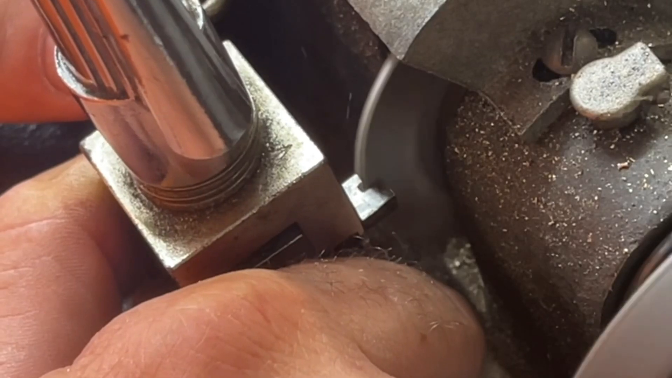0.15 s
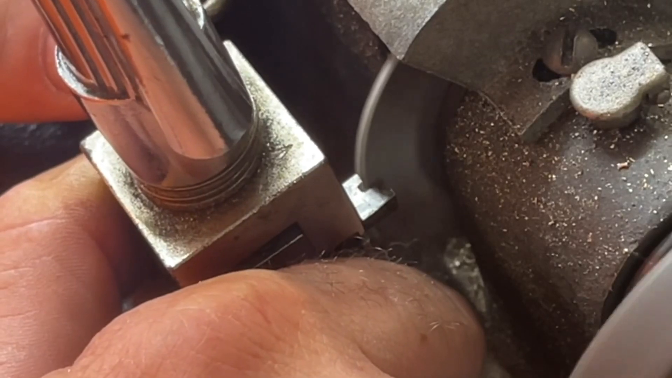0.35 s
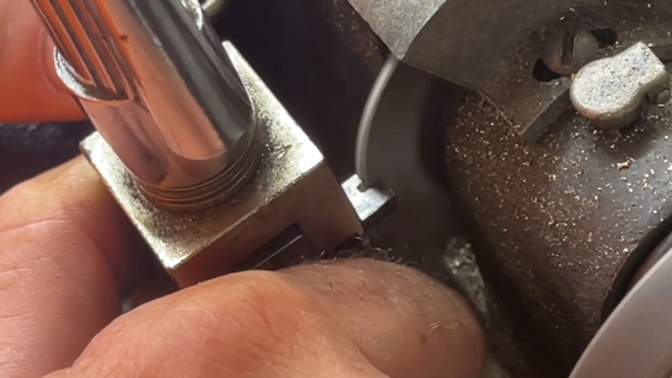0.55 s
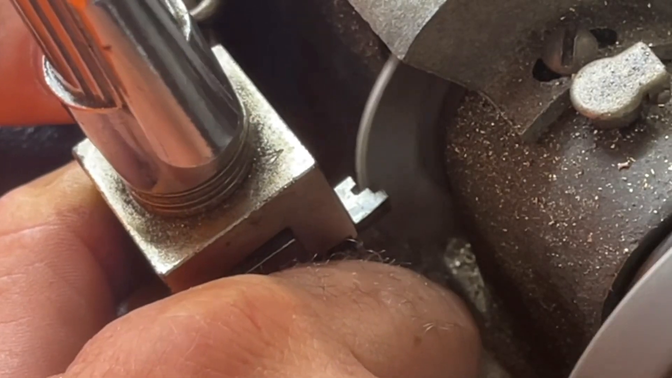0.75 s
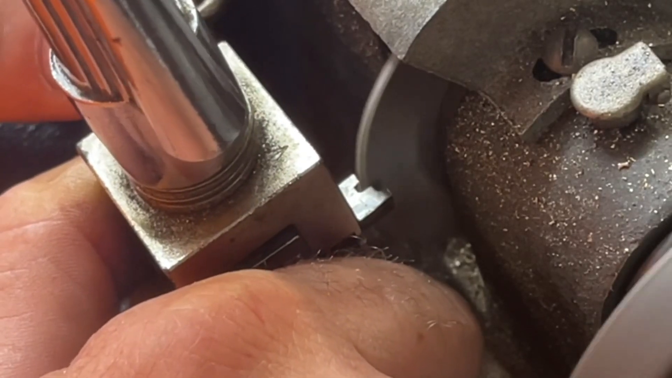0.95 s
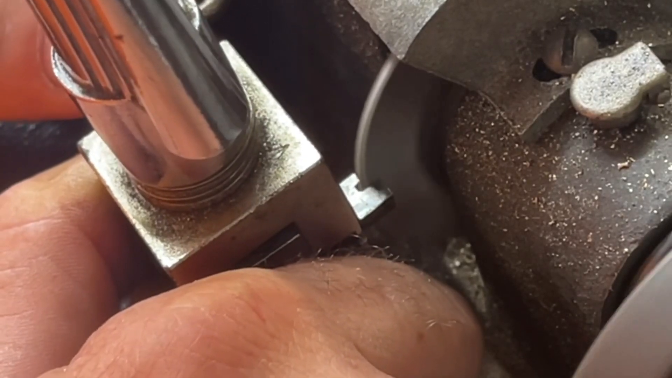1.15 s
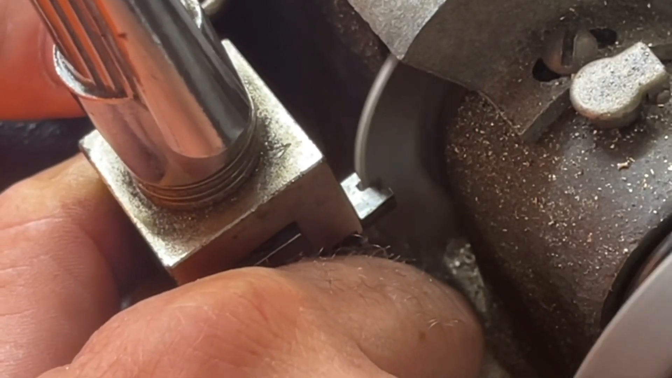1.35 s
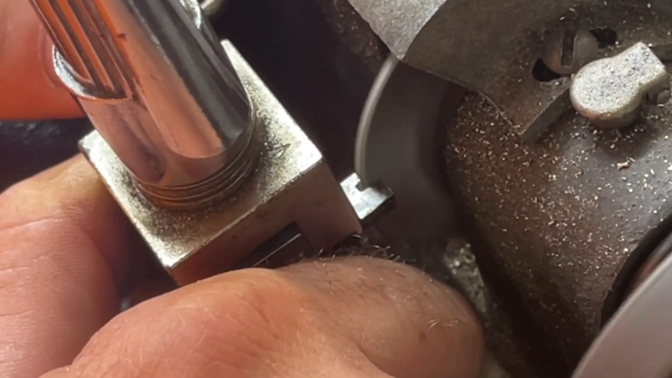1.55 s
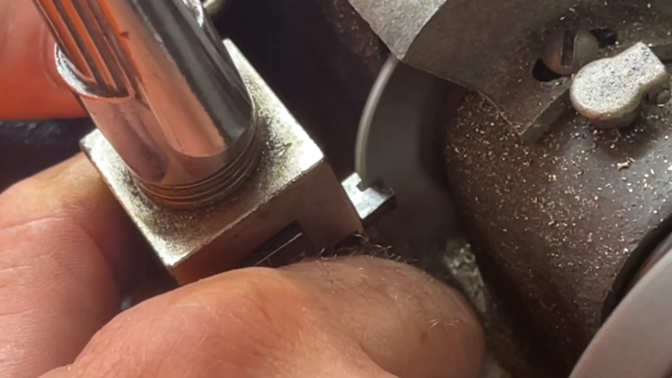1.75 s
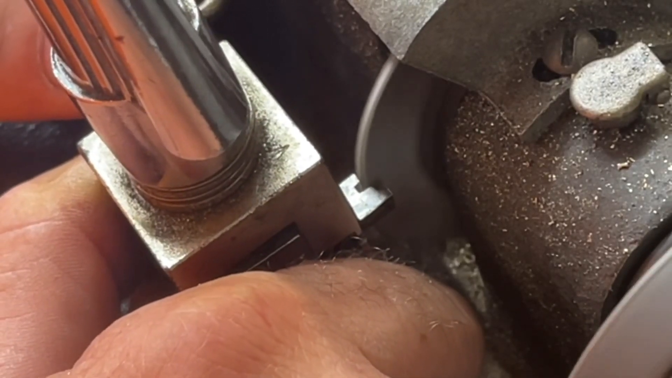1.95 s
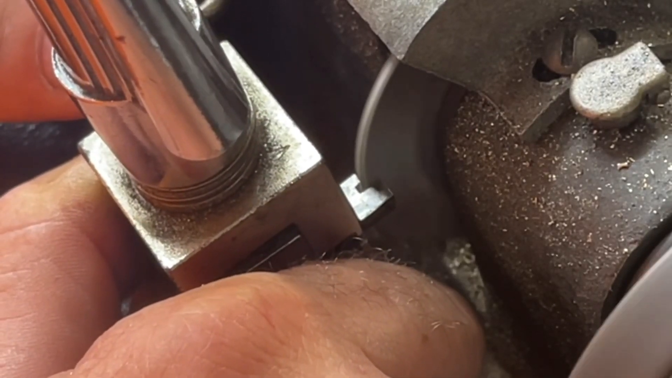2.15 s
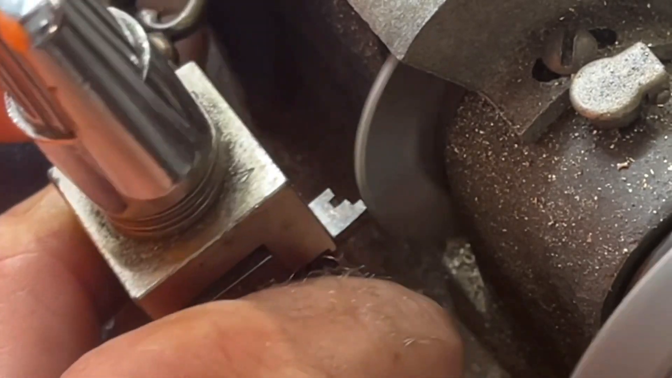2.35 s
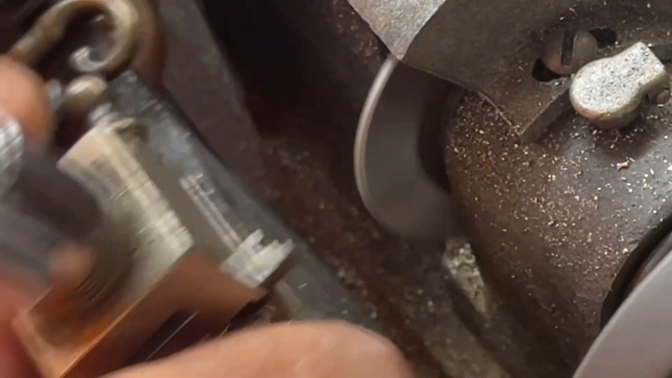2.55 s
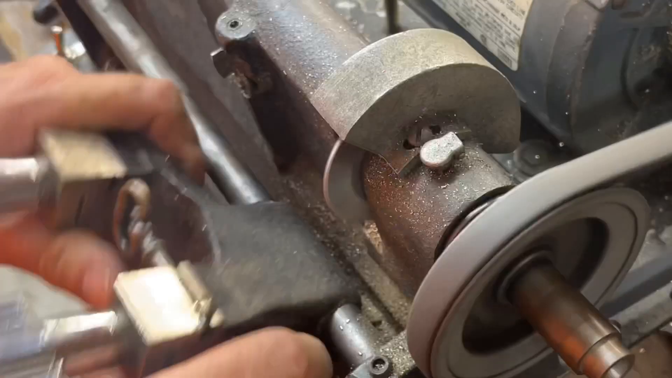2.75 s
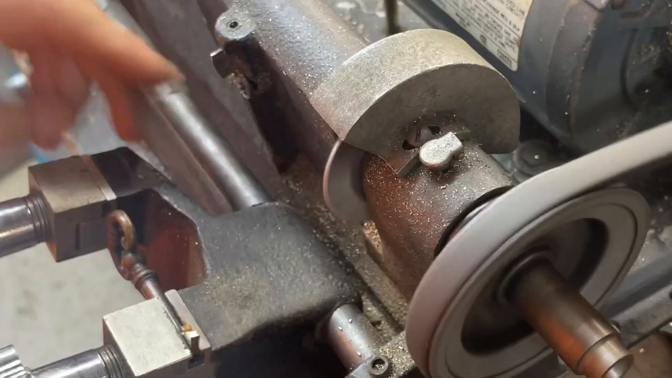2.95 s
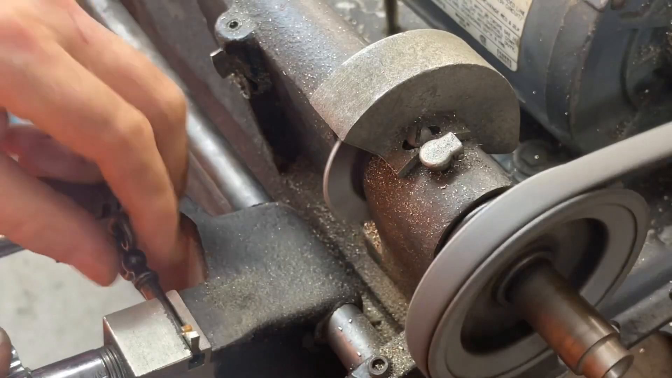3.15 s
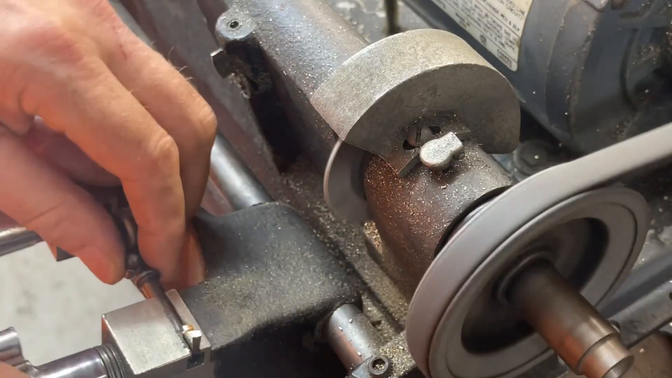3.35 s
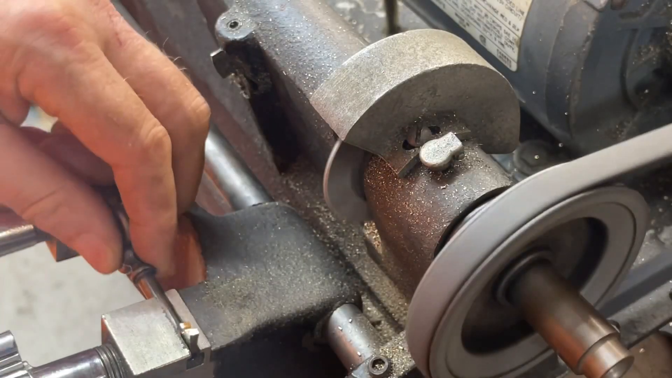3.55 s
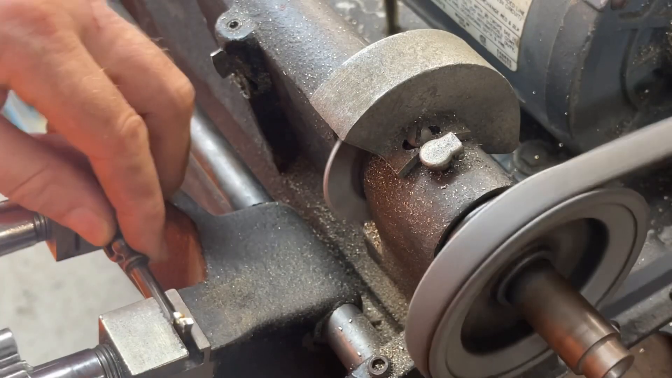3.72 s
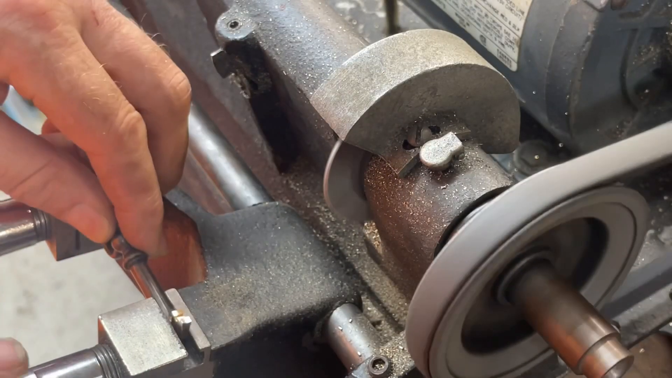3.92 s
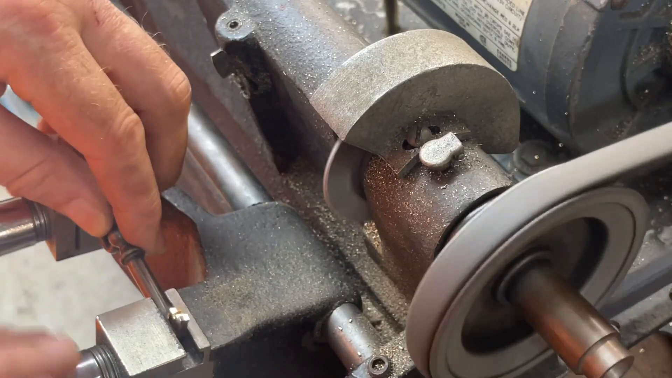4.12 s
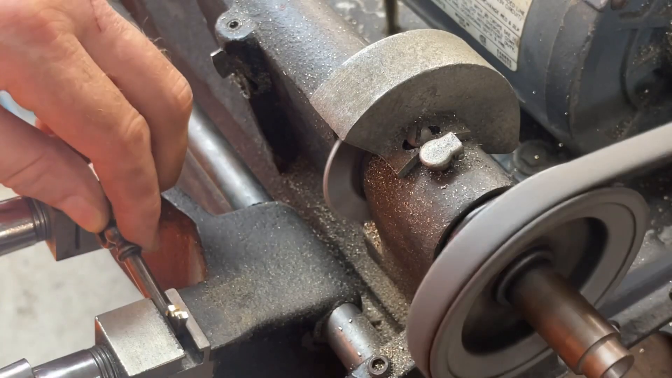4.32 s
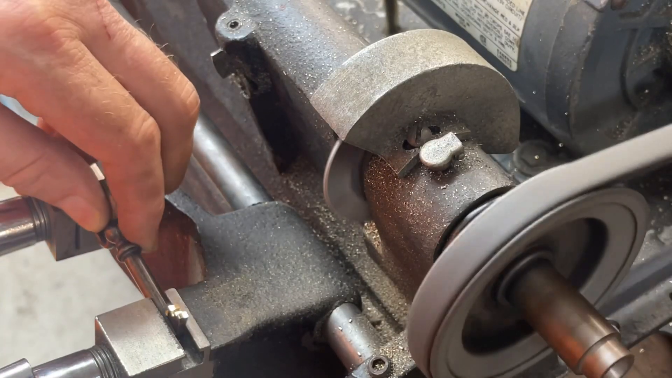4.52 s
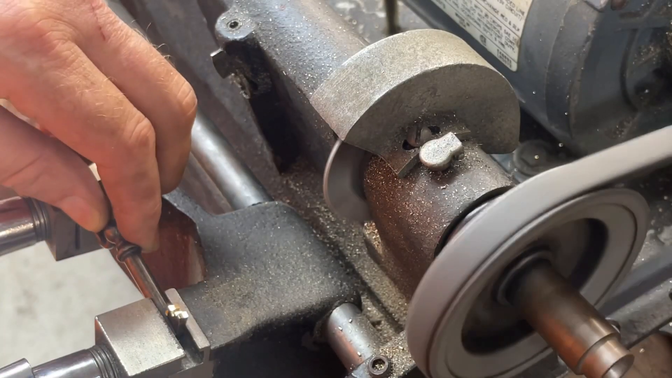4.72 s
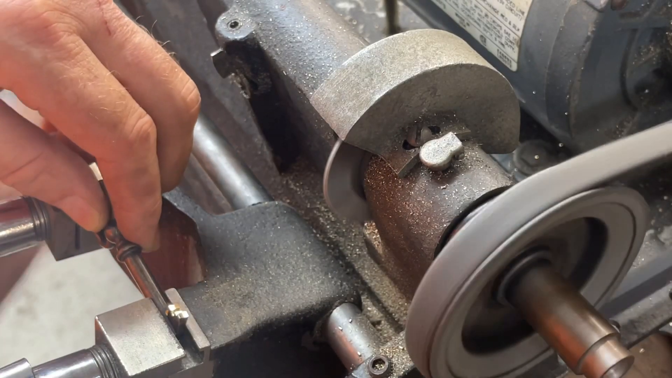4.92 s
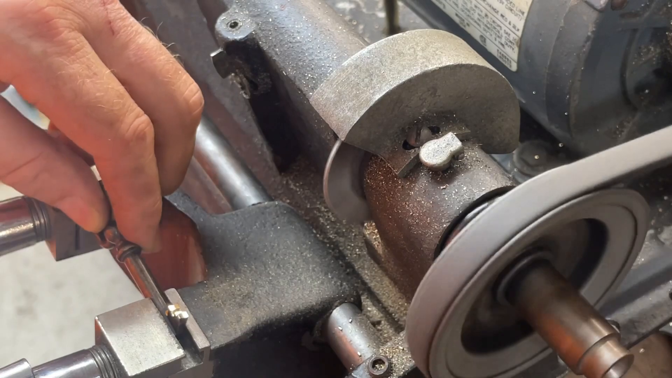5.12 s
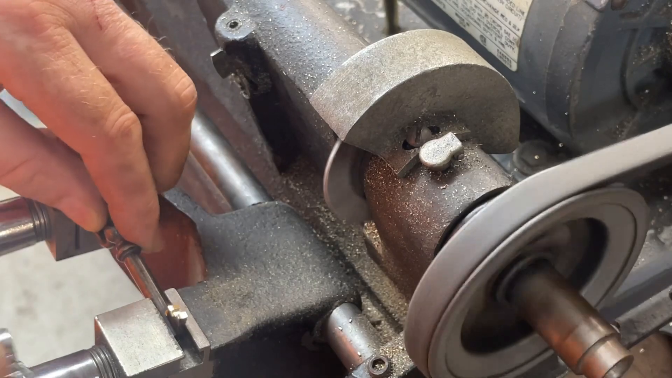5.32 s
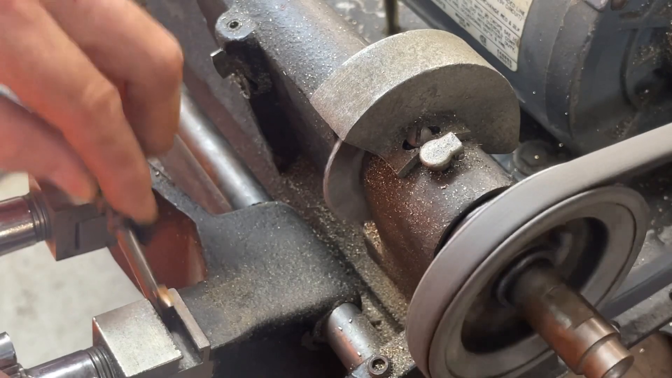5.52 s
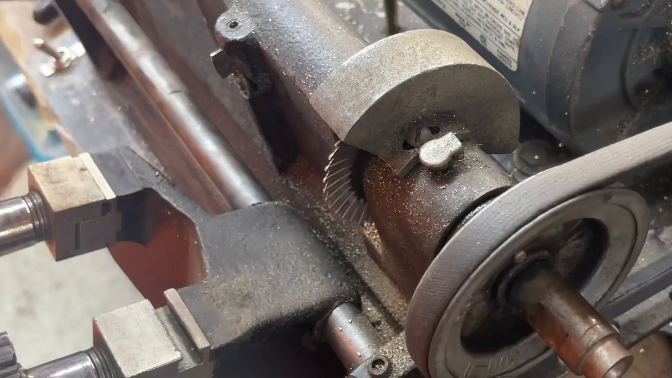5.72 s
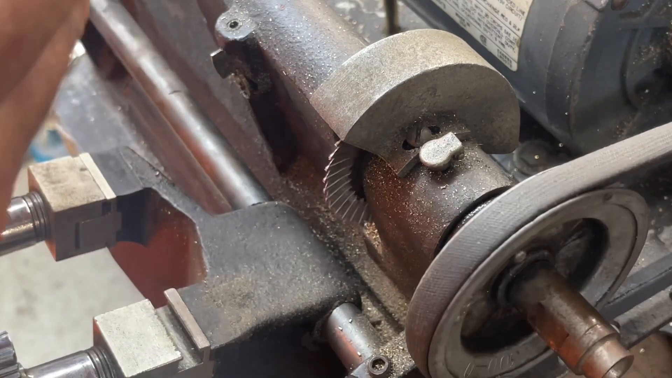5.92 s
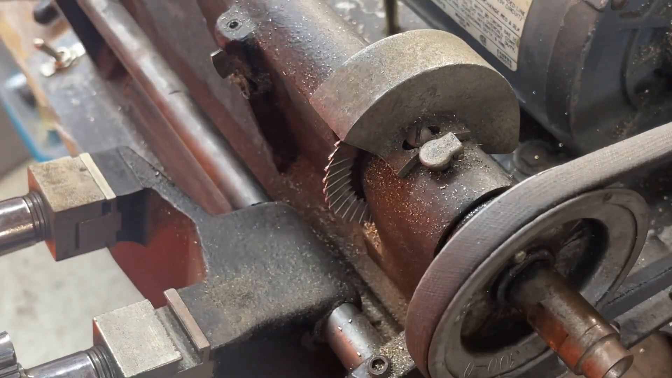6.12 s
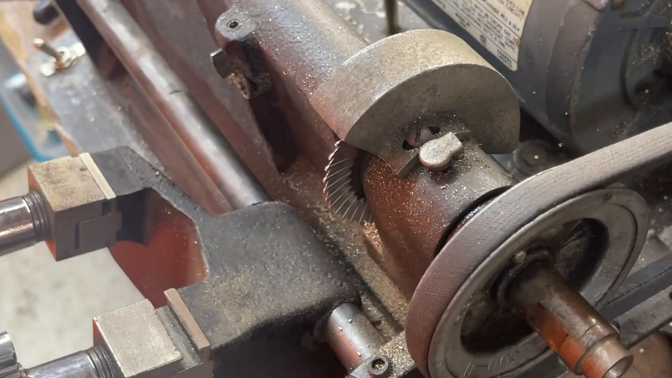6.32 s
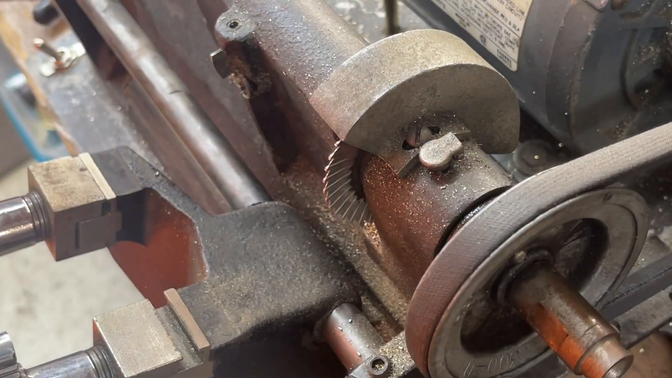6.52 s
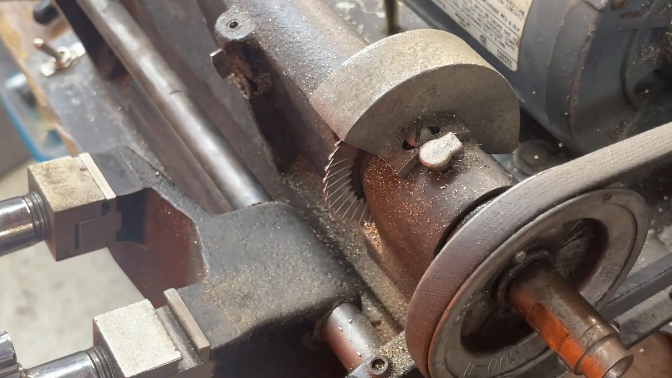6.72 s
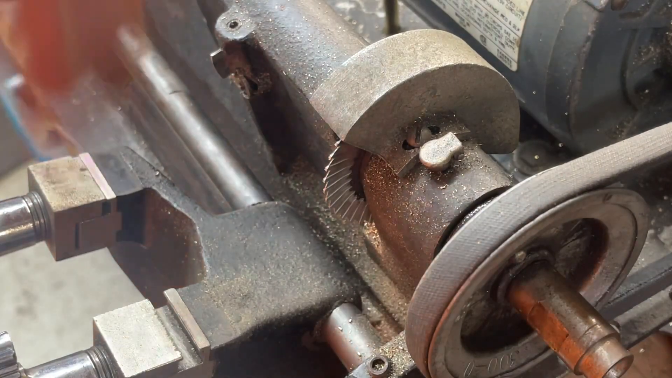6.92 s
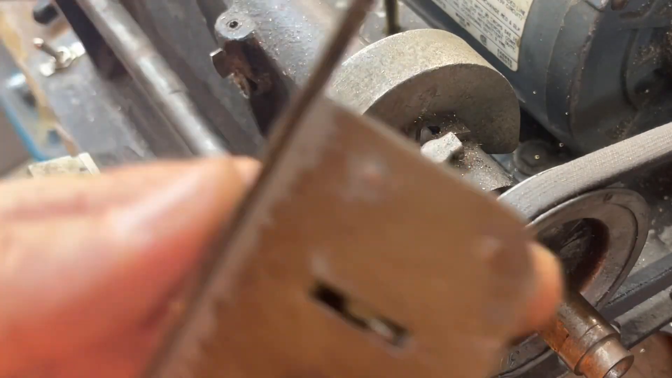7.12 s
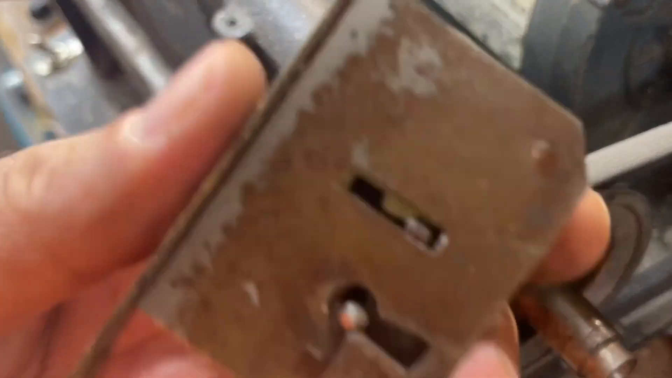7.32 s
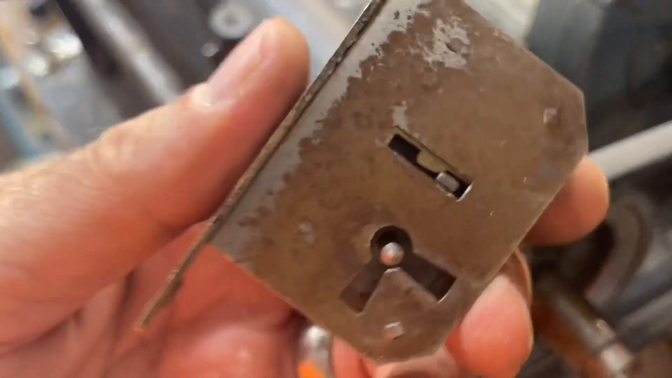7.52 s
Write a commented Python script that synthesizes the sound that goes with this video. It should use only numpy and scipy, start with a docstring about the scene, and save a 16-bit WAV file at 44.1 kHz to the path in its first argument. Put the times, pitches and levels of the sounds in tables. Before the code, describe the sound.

Close in a small workshop, a belt-driven key cutter hums and rattles fast while its teeth rasp at a brass key in tiny gritty bites. The carriage drops back with a loud clunk, briefly ducking the sound. A switch snaps, the machine coasts down in slowing knocks, a key scrapes out of the vice, then soft handling and a thin steel lever squeak follow in near quiet.

```python
"""A belt-driven key-cutting machine hums and rattles close by while its cutter bites into a brass key.
The motor gives steady tones; the belt, shaft and spindle add throbs, thuds and clacks made of shaped noise.
The carriage drops back with a clunk, and a limiter ducks the sound after it.
The motor is switched off and coasts to rest, knock by knock.
The key scrapes out of the vice, and a steel lock is picked up in the quiet workshop."""
import sys
import numpy as np
from scipy import signal
from scipy.fft import rfft, irfft, next_fast_len
from scipy.io import wavfile
from scipy.ndimage import uniform_filter1d, minimum_filter1d

SR = 44100
rng = np.random.default_rng(int(sys.argv[2]) if len(sys.argv) > 2 else 0)


def bounce(signal):
    """Save signal as a 16-bit WAV file at the path given by the first command-line argument."""
    frames = np.transpose(np.atleast_2d(signal))
    limited = np.clip(frames, -1, 1)
    pcm = np.round(limited * 32767).astype(np.int16)
    wavfile.write(sys.argv[1], SR, pcm)


N = 338247
TIME = np.arange(N) / SR
OFF_S = 4.795  # the motor's current stops
SPINDLE_HZ, MOTOR_HZ, BELT_HZ = 19.231, 29.62, 9.42  # turns or laps a second at full speed
MAINS_HZ = 60


def amp(db):
    """Turns decibels into a gain."""
    return 10 ** (np.asarray(db) / 20)


def unit(x):
    """Scales a sound to an rms of one."""
    return x / np.sqrt(np.mean(x ** 2) + 1e-20)


def curve(rows):
    """Joins the points of a time table by straight lines, one value for every sample."""
    return np.interp(TIME, *np.transpose(rows))


def read(points, hz):
    """Reads a frequency table between its points, on a logarithmic frequency axis."""
    f, value = np.transpose(points)
    return np.interp(np.log(hz + 1), np.log(f + 1), value)


def add(mix, s, sound):
    """Lays a sound into the mix at a time in seconds."""
    part = mix[max(round(s * SR), 0):][:len(sound)]
    part += sound[:len(part)]


def drift(rate_hz):
    """Makes a random wander of unit size; a higher rate wanders faster."""
    hz = np.fft.rfftfreq(N, 1 / SR)
    noise = rfft(rng.standard_normal(N))
    return unit(irfft(noise * np.exp(-(hz / rate_hz) ** 2), N))


def body(x, colour, modes=(), hollows=(), size=16384):
    """Filters a sound like a solid object: a broad colour, lifted at ringing modes and dipped at hollows."""
    hz = np.fft.rfftfreq(size, 1 / SR)
    lift = 1 + sum(amp(db) ** 2 / (1 + (2 * (hz - f) / width) ** 2) for f, width, db in modes)
    dip_db = sum(db / (1 + (2 * (hz - f) / width) ** 2) for f, width, db in hollows)
    log_gain = np.log(amp(read(colour, hz) + dip_db) * np.sqrt(lift))
    # minimum phase: the object answers as soon as it can, never before the blow
    both_sides = np.r_[log_gain, log_gain[-2:0:-1]]
    response = np.exp(np.conj(signal.hilbert(both_sides)))
    ring = np.fft.ifft(response).real[:size // 2]
    return signal.oaconvolve(x, ring / np.linalg.norm(ring))[:N]


def resonate(x, hz, width_hz):
    """Rings a sound at one gliding pitch: shift that pitch to zero, smooth, and shift back."""
    turn = np.exp(2j * np.pi * np.cumsum(hz) / SR)
    r = np.exp(-np.pi * width_hz / SR)
    smooth = signal.lfilter([np.sqrt(2 * (1 - r * r))], [1, -r], x / turn + 1e-18)
    return (turn * smooth).real


def burst(shape, smooth_hz=300):
    """Puts noise under an envelope and evens out its colour, so that it sounds like one clean blow."""
    noise = shape * rng.standard_normal(len(shape))
    hz = np.fft.rfftfreq(len(shape), 1 / SR)
    power = uniform_filter1d(abs(rfft(noise)) ** 2, int(smooth_hz / hz[1]) + 1)
    opposite = np.c_[hz, -10 * np.log10(abs(power) + 1e-20)]
    even = body(noise, opposite, size=2048)[:len(shape)]
    return even * np.linalg.norm(shape) / np.linalg.norm(even)


def contacts(rows, rise, decay, tail_db, tail_decay, grain_db, alike):
    """Makes each blow (s, dB) a burst of tiny contacts with a weaker tail, partly alike and partly new."""
    t, power, blows = TIME[:SR // 4], np.zeros(N), np.zeros(N)
    shape = (1 - np.exp(-t / rise)) * (np.exp(-t / decay) + amp(tail_db - 60 * t / tail_decay))
    shape = shape / shape.max()
    same = burst(shape)
    for s, db in rows:
        add(power, s, (amp(db) * shape) ** 2)
        add(blows, s, amp(db) * same)
    grain = unit(amp(np.clip(grain_db * drift(2500), -9, 5)))
    new = np.sqrt(power) * grain * rng.standard_normal(N)
    return alike * blows + np.sqrt(1 - alike ** 2) * new


def pushes(rows, length_s, bounce_s, bounce_db, count=3):
    """Makes each blow (s, dB) a short smooth push of unit area, then nearly even, weaker bounces."""
    t, out = TIME[:SR // 200], np.zeros(N)
    push = t * np.exp(-t / length_s)
    push = push / push.sum()
    all_gaps = rng.uniform(.9, 1.1, (len(rows), count))
    for (s, db), gaps in zip(rows, all_gaps):
        for k, late in enumerate(bounce_s * (np.cumsum(gaps) - gaps[0])):
            add(out, s + 0.00195 + late, amp(db + k * bounce_db) * push)
    return out


def struck(rows, modes, spread):
    """Rings one object with blows of differing hardness, each a band of noise around its centre."""
    t, out = TIME[:SR // 3], np.zeros(N)
    for s, db, hz, rise, decay in rows:
        edges_hz = [hz / spread, min(hz * spread, .45 * SR)]
        band = signal.butter(2, edges_hz, "band", fs=SR, output="sos")
        shape = (1 - np.exp(-t / rise)) * np.exp(-t / decay)
        blow = signal.sosfilt(band, burst(shape))
        same_energy = np.linalg.norm(shape / shape.max()) / np.linalg.norm(blow)
        add(out, s, amp(db) * blow * same_energy)
    return body(out, [(1, 0), (SR, 0)], modes)


def grains(per_s, scatter_db):
    """Scatters tiny catches at random moments, of uneven size and either sign."""
    present = rng.random(N) < per_s / SR
    size = amp(scatter_db * rng.uniform(-0.92, 1, N))
    return unit(present * rng.choice([-1, 1], N) * size)


def workshop():
    """Low room rumble, made of coloured noise, with a faint mains drone."""
    # colour of the room: f/Hz, level/dB
    room = [(15, -59), (25, -31.5), (43, -9.5), (64, 2), (87, -12), (123, -7), (153, -13.5), (293, -23),
            (460, -28.5), (600, -30.5), (900, -33.5), (8360, -58), (16000, -69)]
    drone = amp(-68.0 + 2.5 * drift(5)) * np.sin(2 * np.pi * MAINS_HZ * TIME)
    return amp(-55.5 + 0.85 * drift(8)) * body(rng.standard_normal(N), room) + drone


def clicks():
    """Lists small clicks as blows (s, dB, Hz, rise s, decay s); a higher click dies sooner."""
    # clicks of hands, key and lock: t/s, level/dB, centre f/Hz
    handling = [(5.459, -44, 7500), (5.485, -47, 7000), (5.522, -51, 7000), (5.541, -47, 7000),
                (5.559, -53, 5000), (5.573, -48, 7000), (5.613, -50.5, 6500), (5.6476, -48, 3340),
                (5.652, -44.5, 710), (5.8507, -60, 7100), (6.662, -49, 560), (6.6607, -63, 2080),
                (6.696, -66, 4000), (6.806, -56, 9000), (6.813, -43, 9070), (7.165, -53, 8900),
                (7.345, -47.5, 7500), (7.376, -59, 7500)]
    rise_s, decay_at_1khz_s, shortening = 0.00032, 0.0096, 0.54
    return [(s, db, hz, rise_s, decay_at_1khz_s * (hz / 1e3) ** -shortening) for s, db, hz in handling]


def rubbing(catches_db=-6):
    """Skin and sleeve stroke metal: noise and fine catches swell and fade under an uneven grip."""
    # strokes: middle t/s, level/dB, length between half heights/s
    rubs = [(5.39, -51.5, 0.13), (5.585, -74, 0.18), (5.93, -76, 0.2), (6.39, -67, 0.081),
            (6.513, -65.5, 0.046), (6.826, -64, 0.24), (7.096, -59.5, 0.15), (7.368, -69.5, 0.11)]
    # colour of the rubbing: f/Hz, level/dB
    skin = [(200, 14), (800, -1), (1400, -2), (2200, -1), (3600, 1), (5500, 0.5), (7000, 3), (12000, -2),
            (16000, -31.5)]
    strokes = sum(amp(db) * .5 ** ((2 * (TIME - s) / length) ** 2) for s, db, length in rubs)
    friction = unit(rng.standard_normal(N) + amp(catches_db) * grains(per_s=500, scatter_db=14))
    grip = amp(0.84 * drift(52))
    return body(strokes * grip * friction, skin, [(2060, 240, 8.1), (5360, 160, 3)])


def slides():
    """Light strokes along smooth metal hiss in one narrow, falling band."""
    # strokes: middle t/s, level/dB, length between half heights/s, f in the middle/Hz
    strokes = [(5.707, -69.5, 0.17, 5350), (6.983, -66, .14, 5540)]
    fall_hz_per_s, width_hz = 2800, 780
    out = np.zeros(N)
    for s, db, length, hz in strokes:
        glide = hz - fall_hz_per_s * np.clip(TIME - s, -length, length)
        hiss = resonate(rng.standard_normal(N), glide, width_hz)
        hiss = resonate(hiss, glide, width_hz)  # a second pass steepens the band's sides
        out += amp(db) * .5 ** ((2 * (TIME - s) / length) ** 2) * unit(hiss)
    return out


def lock(squeak_db=-5, octave_db=-9, width_hz=45, case_db=-3.0):
    """The lever slides in tiny slips that ring the steel case, with a gliding squeak and its octave."""
    # strength of the sliding: t/s, level/dB
    lever = [(7.508, -95), (7.511, -52), (7.54, -56), (7.565, -55), (7.6, -61), (7.66, -72)]
    # pitch of the squeak: t/s, f/Hz
    lever_ring = [(7.51, 2250), (7.525, 2270), (7.565, 2300), (7.61, 2190), (7.66, 2190)]
    # colour of the case: f/Hz, level/dB
    steel = [(300, -22.5), (1500, -11), (2800, 2), (3500, -10), (4200, -5), (5700, -5), (6800, -8),
             (9000, -4), (12000, -8), (16000, -20)]
    # ringing of the case: f/Hz, width/Hz, lift/dB
    steel_modes = [(2326, 30, 17), (3020, 60, 7.9), (4190, 50, 11), (4470, 37, 13), (5652, 100, 8),
                   (7311, 40, 8), (8300, 250, 10), (11350, 207, 8), (12580, 150, 14)]
    sliding = TIME > lever[0][0]
    slips = amp(curve(lever)) * sliding * grains(per_s=1700, scatter_db=3)
    pitch_hz = curve(lever_ring)
    squeak = resonate(slips, pitch_hz, width_hz)
    octave = resonate(slips, 2 * pitch_hz, 2 * width_hz)
    case = body(slips, steel, steel_modes)
    return amp(case_db) * case + amp(squeak_db) * squeak + amp(octave_db) * octave


def hands():
    """Everything that the operator moves: noise blows ring the carriage, switch and key; the lock follows."""
    # blows, each table: t/s, level/dB, centre f/Hz, rise/s, decay/s
    carriage_blows = [(2.7856, -6, 1800, 0.0001, 0.00091), (2.786, -16.5, 8000, .0001, 0.0024),
                      (2.7875, -6.5, 750, 0.0005, 0.005), (2.7895, -5.5, 340, 0.0011, 0.004),
                      (2.8, -23, 1200, .002, 0.0088), (2.807, -15, 260, .0005, 0.0046),
                      (2.816, -18, 800, 0.002, 0.0065), (2.835, -30, 400, .003, 0.022)]  # landing and bouncing
    bumps = [(5.465, -50.5, 250, 0.0023, 0.043), (6.368, -48, 228, 0.01, 0.012),
             (6.46, -63, 304, 0.0045, 0.039)]  # a hand bumps the bench, ringing its low mode
    switch_blows = [(4.7545, -19.5, 8570, 0.0014, 0.0054), (4.7558, -16.5, 2250, 0.0004, 0.0035)]  # snapping over
    key_scrapes = [(5.341, -31.5, 1210, 0.013, 0.017), (5.3525, -22.5, 4500, 0.002, 0.0059),
                   (5.3575, -51.5, 2400, .0005, 0.0027), (5.3605, -20.5, 5500, 0.00027, 0.003),
                   (5.389, -43, 7000, .001, 0.011), (5.5, -55, 1175, 0.033, 0.029)]  # coming out of the vice
    scuffs = [(6.458, -66, 1506, .005, .01), (6.503, -66, 2000, .004, .01),
              (6.528, -62.5, 1200, 0.0036, 0.0067), (6.817, -58, 2300, .004, 0.01),
              (7.043, -51, 480, 0.0016, 0.0072)]  # picking up the lock
    # ringing of the struck parts, each table: f/Hz, width/Hz, lift/dB
    carriage_modes = [(108, 34, 2), (343, 12, 9), (392, 53, 7), (970, 15, 8), (1160, 50, 6), (1400, 20, 9),
                      (1670, 100, 3), (1980, 50, 5), (2654, 30, 7.1), (3050, 46, 9)]
    switch_modes = [(1932, 145, 9.9), (2240, 63, 15), (2444, 70, 8), (3880, 55, 20)]
    vice_modes = [(970, 200, 20.3), (1180, 55, 25), (2610, 200, 6.7), (8000, 150, 14), (12500, 820, 15)]
    carriage = struck(carriage_blows, carriage_modes, spread=2.7)
    carriage += struck(bumps, [(235, 14, 14.8)], spread=1.42)
    switch = struck(switch_blows, switch_modes, spread=1.36)
    key = struck(key_scrapes, vice_modes, spread=4.6)
    small = struck(clicks(), [], spread=1.82) + struck(scuffs, [], spread=1.38)
    return carriage + switch + key + lock() + small + rubbing() + slides()


def drive_speed():
    """Gives the share of full speed: steady, then slowed by friction to rest."""
    coast_from_s, rest_s, power = 4.732, 5.78, 1.3
    time_left = np.clip((rest_s - TIME) / (rest_s - coast_from_s), 0, 1)
    return time_left ** power


def chatter_db(db_per_halving=5.5):
    """Gives the level of the loose parts' chatter, which falls with every halving of the speed."""
    # chatter at full speed: t/s, level/dB
    chatter = [(0, -4.5), (2.7, 1.5), (3.1, -2.5), (4.77, -3), (4.83, -4), (5.3, -1.5)]
    return curve(chatter) + db_per_halving * np.log2(drive_speed() + 1e-6)


def each_turn(first_s, turn_hz, db, scatter_db, jitter_s):
    """Lists a blow (s, dB) that comes once a turn while the motor drives, a little uneven."""
    s = np.arange(first_s, OFF_S - .01, 1 / turn_hz)
    late, strong = rng.standard_normal((len(s), 2)).T
    return np.c_[s + jitter_s * late, db + scatter_db * strong]


def hum():
    """The iron hums at twice the mains frequency and beats with the shaft's tones until the current stops."""
    # tones of the shaft: multiple of its turning rate, level/dB
    motor_orders = [(4, -76), (8, -49), (10, -55.5), (12, -48)]
    iron_turns = 2 * MAINS_HZ * TIME + 0.022 * drift(8)
    iron = amp(-32.5 + 0.87 * drift(6.2)) * np.cos(2 * np.pi * iron_turns)
    turns = MOTOR_HZ * TIME + 0.027 * drift(5.0)
    shaft = sum(amp(db) * np.cos(2 * np.pi * k * turns) for k, db in motor_orders)
    current = np.clip((OFF_S - TIME) / 0.01 + .5, 0, 1)
    return np.sqrt(2) * (iron + shaft) * current  # root two: the levels are rms


def rotor(db=-44.0, speed_power=1.8):
    """The rotor's low whirr is coloured noise that fades quickly as it slows."""
    # colour of the whirr: f/Hz, level/dB
    whirr = [(100, -33.5), (150, -8), (215, -1.5), (300, -9.5), (380, -1.5), (550, -28.5), (2000, -69)]
    return amp(db) * drive_speed() ** speed_power * body(rng.standard_normal(N), whirr)


def belt():
    """The uneven belt shakes the bench with the harmonics of its lap, less as it slows."""
    # colour of the shaking bench: f/Hz, level/dB
    bench = [(25, -29), (38, -27), (47, -17.5), (66, -15), (85, -7.5), (94, -3), (104, 4.5), (113, 2.5),
             (122, -10.5), (135, -20.5), (200, -40.5)]
    speed = drive_speed()
    laps = np.cumsum(BELT_HZ * speed) / SR
    throb = np.zeros(N)
    for k in range(3, 18):
        level = amp(read(bench, k * BELT_HZ * speed))
        throb += level * np.cos(2 * np.pi * (k * laps + rng.random()))
    load_db = curve([(0, -40), (2.75, -39), (2.9, -41), (4.8, -46)])  # pressing on the cutter loads the belt
    rumble = amp(-46.0) * body(rng.standard_normal(N), bench)
    return amp(load_db + 2.4 * drift(9.5)) * throb * speed ** 2 + rumble * np.sqrt(speed)


def loose_parts(per_s=60, db=-35, scatter_db=2.0, low_hz=1500, high_hz=2900, ring_s=.0022):
    """Small loose parts tick at random on the shaking frame, each with three short partials."""
    t, out, level_db = TIME[:SR // 40], np.zeros(N), db + chatter_db()
    for at in np.flatnonzero(rng.random(N) < per_s * drive_speed() / SR):
        hz = low_hz * (high_hz / low_hz) ** rng.random((3, 1))
        tick = np.sin(2 * np.pi * hz * t).sum(0) * np.exp(-t / ring_s)
        add(out, at / SR, amp(level_db[at] + scatter_db * rng.uniform(-5.5, 1.2)) * tick)
    return out


def rattle(knocks, thuds):
    """The motor shaft's thuds ring the cast frame; the spindle's knocks and loose parts join in."""
    # colour of the frame: f/Hz, level/dB
    frame = [(60, -19.5), (150, -21), (215, -9), (300, -12.5), (430, -6), (700, -0.5), (950, -5),
             (1200, -7), (2000, -25), (3000, -25.5), (4500, -34.5), (9000, -34.5), (16000, -53)]
    # ringing of the frame: f/Hz, width/Hz, lift/dB
    frame_modes = [(340.7, 11, 10), (444, 31, 13.4), (559.8, 34, 12.5), (661, 17, 6), (737.4, 37, 11.1),
                   (817, 10, 4.9), (869, 42, 11.9), (1471, 27, 15.4), (2054, 66, 6.5)]
    # where the frame's waves cancel: f/Hz, width/Hz, dip/dB
    frame_hollows = [(267, 22, -8.5), (365, 28, -8), (615, 42, -4), (784, 24, -9.5)]
    drive = amp(-27.0) * contacts(thuds, rise=0.0032, decay=0.0041, tail_db=-19, tail_decay=0.16,
                                  grain_db=1, alike=0.76)
    drive += amp(-2.0) * pushes(thuds, length_s=0.0002, bounce_s=.0068, bounce_db=-3)
    drive += amp(-26.5) * contacts(knocks, rise=0.0031, decay=0.0098, tail_db=-21.5, tail_decay=0.22,
                                   grain_db=0, alike=.6)
    drive += amp(-34.0 + chatter_db(db_per_halving=9)) * rng.standard_normal(N)
    return body(drive, frame, frame_modes, frame_hollows)


def spindle(knocks, backlash, backlash_db=1):
    """The cutter spindle clacks each turn and rebounds; its guard buzzes after it and with the backlash."""
    # harder rebounds: t/s, level/dB
    hard_rebounds = [(0.722, -11.5), (.824, -11.5), (3.3195, -5), (3.837, -7.5), (3.993, -5), (4.15, -18),
                     (4.203, -11.5)]
    # colours of spindle housing and guard, each table: f/Hz, level/dB
    housing = [(200, -33), (800, -9), (1500, -0.5), (2700, 5.5), (4100, -4), (5500, -3.5), (7000, -8.5),
               (9000, -6), (12000, -11.5), (16000, -24)]
    guard = [(300, -10), (900, 4.5), (1400, -4), (1900, -8), (2600, -8.5), (3400, -13.5), (4500, -24),
             (12000, -32)]
    # ringing of spindle housing and guard, each table: f/Hz, width/Hz, lift/dB
    housing_modes = [(2170, 120, 12), (3094, 140, 6), (3666, 37, 14), (3830, 70, 8.3), (4160, 70, 4),
                     (4468, 62, 19.4), (5160, 110, 12), (5470, 120, 9.7), (6820, 230, 7), (8300, 200, 4)]
    guard_modes = [(1043, 54, 3.7), (1524, 68, 9.6), (2085, 41, 3.5), (2130, 63, 6.1), (2693, 150, 2)]
    # where the housing's waves cancel: f/Hz, width/Hz, dip/dB
    housing_hollows = [(1920, 100, -8), (3770, 90, -4), (3930, 90, -10), (4930, 140, -2.5),
                       (6300, 200, -2.5), (7200, 250, -2.5)]
    light_rebounds = each_turn(.043, SPINDLE_HZ, db=-17.5, scatter_db=2.2, jitter_s=0.0012)
    rebounds = np.r_[light_rebounds, hard_rebounds]
    # the spindle strikes the same spot each turn, so its clacks are much alike
    clack = contacts(np.vstack([knocks, rebounds]), rise=0.0002, decay=0.003, tail_db=-19, tail_decay=0.12,
                     grain_db=7.5, alike=.92)
    shaken = np.vstack([knocks + [.002, 0], rebounds + [0, 6], backlash + [0, backlash_db]])
    buzz = amp(-28.5) * contacts(shaken, rise=0.00073, decay=0.0067, tail_db=-13.5, tail_decay=0.06,
                                 grain_db=1.5, alike=.75)
    buzz += amp(-49.5 + chatter_db() + np.minimum(5 * drift(110), 8)) * rng.standard_normal(N)
    whirr = amp(-62 + chatter_db() + 2.3 * drift(200)) * rng.standard_normal(N)
    sound = body(amp(-28.5) * clack, housing, housing_modes, housing_hollows)
    sound += body(whirr, housing, hollows=housing_hollows)
    sound += body(buzz, guard, guard_modes)
    nearness_db = curve([(0, 1), (.8, 0.52), (2.4, -1.3), (3.2, 0.75), (4, 1), (4.7, -1.1)])
    return amp(nearness_db) * sound


def teeth(tooth_hz=1150, jitter=.12, scatter_db=4.0, tearing_db=-7, tooth_share=0.24):
    """Each tooth snaps off one chip, followed by a short tearing hiss."""
    late, strong = rng.uniform(-0.92, 1, (2, N))
    tooth = np.arange(int(tooth_hz * TIME[-1]) - 1)
    at = ((tooth + jitter * late[tooth]) * SR / tooth_hz).astype(int)
    snaps = np.zeros(N)
    snaps[at] = amp(scatter_db * strong[tooth]) * rng.choice([-1, 1], len(tooth))
    since_tooth = tooth_hz * TIME % 1
    tearing = np.exp(-since_tooth / tooth_share) * rng.standard_normal(N)
    return unit(unit(snaps) + amp(tearing_db) * unit(tearing))


def cutting(ring_db=-7, ring_width_hz=130, drag_throb_db=7, bite_throb_db=1.0):
    """Teeth tear brass in short bites and drag between; the hum shakes the key against them, and it rings."""
    # bites: middle t/s, relative level/dB, length between half powers/s
    bites = [(.008, -24.5, 0.0053), (0.04, -31, 0.01), (0.06, -25.5, 0.0092), (0.08, -26.5, 0.013),
             (0.111, -21.5, 0.0046), (0.148, -24, 0.0032), (0.164, -22.5, 0.0032), (0.218, -21.5, 0.0049),
             (.27, -25, 0.0056), (0.321, -21.5, 0.005), (0.352, -23, 0.0031), (0.359, -26.5, .004),
             (0.372, -23, 0.006), (0.423, -20, 0.0064), (0.447, -25.5, 0.0022), (.459, -33, 0.0059),
             (0.476, -20.5, 0.004), (0.526, -27.5, 0.0039), (1.034, -35, 0.0034), (1.187, -32.5, 0.0036),
             (1.275, -36, 0.0028), (1.288, -24, 0.0046), (1.325, -26.5, 0.014), (1.377, -23.5, 0.0029),
             (1.483, -32, 0.0037), (1.589, -32, 0.0019), (1.638, -34.5, 0.0051), (1.658, -27, 0.0044),
             (1.689, -26, .007), (1.704, -30, 0.003), (1.743, -32, 0.0079), (1.794, -34.5, 0.0027),
             (1.847, -34, 0.0032)]
    # light drags between bites: start t/s, end t/s, relative level/dB
    drags = [(.04, 0.272, -41.5), (0.336, 0.493, -42), (1.27, 1.4, -46.5), (1.631, 1.716, -35)]
    # colour of the key: f/Hz, level/dB
    brass = [(500, 1), (1500, 2), (2500, -6), (4100, -12.5), (4700, 0.5), (6700, -14.5), (7500, -8),
             (8400, -4), (9500, -9.5), (12000, -10), (16000, -4.5)]
    # ringing of the key: f/Hz, width/Hz, lift/dB
    brass_modes = [(2315, 30, 10), (4600, 110, 11.8), (5310, 84, 11), (6350, 44, 5.4), (6700, 90, 20),
                   (10850, 180, 4), (11500, 82, 6.6), (12400, 140, 10), (14620, 62, 14)]
    # the key's upper ring, falling as the cut moves along it: t/s, f/Hz
    key_ring = [(.45, 5460), (1.25, 5090)]
    shake = np.cos(2 * np.pi * 2 * MAINS_HZ * TIME)
    bite_power = sum(amp(db) ** 2 * .5 ** np.minimum((2 * (TIME - s) / length) ** 2, 60)
                     for s, db, length in bites)
    bite_power = bite_power * amp(bite_throb_db * shake) ** 2
    drag_power = sum(amp(db) ** 2 * ((TIME > start) & (TIME < end)) for start, end, db in drags)
    drag_power = drag_power * unit(amp(drag_throb_db * shake + 2.0 * drift(60))) ** 2
    chips = np.sqrt(bite_power + drag_power) * teeth()
    ring = resonate(chips, curve(key_ring), ring_width_hz)
    return amp(1.5) * (body(chips, brass, brass_modes) + amp(ring_db) * ring)


def ports(x, echo_t60=0.17):
    """Two microphone ports hear the direct sound slightly apart, and near reflections with opposite signs."""
    # how far the left port leads: f/Hz, phase/radians
    port_phase = [(20, 0), (280, .05), (450, -.25), (950, -.3), (2000, 0), (3500, .2), (6000, .05),
                  (8850, 0), (9800, -2.7), (10400, -3.3), (11700, -6), (12800, -6.5), (13100, -9.3),
                  (14300, -9.5), (15200, -12.5)]
    # left minus right: f/Hz, level/dB
    port_balance = [(60, -0.33), (110, -0.5), (200, -0.72), (380, 0.93), (700, 0.86), (1290, -0.71),
                    (2380, 0.0), (4400, 0.0), (8120, -0.41), (15000, 0.0)]
    # how alike the two ports are: f/Hz, likeness from 0 to 1
    port_likeness = [(60, 1), (150, .995), (400, .93), (750, .8), (1200, .94), (2200, .99), (3500, .94),
                     (8500, .97), (9400, .7), (10200, .95), (15000, .75)]
    size = next_fast_len(N + SR)
    hz, t = np.fft.rfftfreq(size, 1 / SR), TIME[:SR // 5]
    echoes = rng.standard_normal(len(t)) * amp(-60 * t / echo_t60)
    echoes = rfft(echoes / np.linalg.norm(echoes), size)
    likeness = np.clip(read(port_likeness, hz), 0, 1)
    side = amp(-1.0) * np.sqrt((1 - likeness) / 2) * echoes
    turn = amp(read(port_balance, hz) / 2) * np.exp(.5j * read(port_phase, hz))
    left_right = np.array([(1 + side) * turn, (1 - side) / turn])
    return irfft(rfft(x, size) * left_right, size)[:, :N]


def scene():
    """Joins machine, cut, operator and room; play in the motor shaft gives a thud and backlash each turn."""
    # blows of the coasting machine, each table: t/s, level/dB
    coast_knocks = [(4.792, -1), (4.85, -4), (4.914, -3), (4.987, -3.5), (5.067, -12), (5.158, -7.5),
                    (5.273, -16), (5.449, -17)]  # spindle
    coast_thuds = [(4.808, 0), (4.846, 0.5), (4.887, 0), (4.931, -3), (4.975, 3.5), (5.026, -2),
                   (5.08, 0.5), (5.138, 2), (5.209, -2.5), (5.289, 1), (5.393, 2), (5.576, -19.5)]  # motor shaft
    coast_backlash = [(4.873, -6), (4.919, -2.5), (4.958, 0), (5.006, -3.5), (5.059, -1.5), (5.117, -3.5),
                      (5.257, -8), (5.458, -12)]  # motor shaft
    # slow change of the stereo balance: t/s, left minus right level/dB
    stereo_balance = [(2.4, 0.57), (2.9, 0), (5.5, 0), (6, 2)]
    knocks = np.r_[each_turn(.0075, SPINDLE_HZ, db=1, scatter_db=1.2, jitter_s=.0002), coast_knocks]
    thuds = np.r_[each_turn(.0115, MOTOR_HZ, db=-1, scatter_db=0, jitter_s=0.001), coast_thuds]
    backlash = np.r_[each_turn(.029, MOTOR_HZ, db=-7.0, scatter_db=3.0, jitter_s=0.0012), coast_backlash]
    machine = hum() + rotor() + belt() + loose_parts()
    machine += rattle(knocks, np.vstack([thuds, backlash])) + spindle(knocks, backlash) + cutting()
    stereo = ports(machine + hands() + workshop())
    return stereo * amp(curve(stereo_balance) * np.array([[.5], [-.5]]))


def record(dry, ceiling_db=-4.5, hold_s=0.14, recovery_db_per_s=105):
    """Colours the high treble, adds a limiter that holds and then recovers, and a limit to the treble."""
    # colour of the high treble: f/Hz, level/dB
    treble_colour = [(20, 0.5), (9300, -1), (10200, 4), (11000, 4.5), (12300, -5.5), (12900, -16.5),
                     (13900, -21.5), (14600, -16), (15700, -15), (16200, -29)]
    size = next_fast_len(N + SR)
    gain = amp(read(treble_colour, np.fft.rfftfreq(size, 1 / SR)))
    x = irfft(rfft(dry, size) * gain, size)[:, :N]
    over_db = np.maximum(20 * np.log10(abs(x).max(0) + 1e-9) - ceiling_db, 0)
    half = int(hold_s * SR / 2)
    held_db = -minimum_filter1d(-over_db, 2 * half + 1, origin=half)
    recovery_db = recovery_db_per_s * TIME
    duck_db = np.maximum.accumulate(held_db + recovery_db) - recovery_db
    widened_db = -minimum_filter1d(-duck_db, size=21)  # so that smoothing does not miss a peak
    x = x * amp(-uniform_filter1d(widened_db, size=21))
    low_pass = signal.firwin(511, 16400, window=("kaiser", 9), fs=SR)  # edge in Hz
    return signal.oaconvolve(x, low_pass[None], "same")


dry = scene()
out = record(dry)
bounce(out)
```